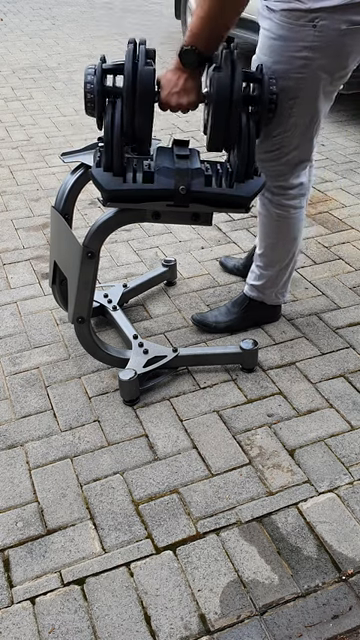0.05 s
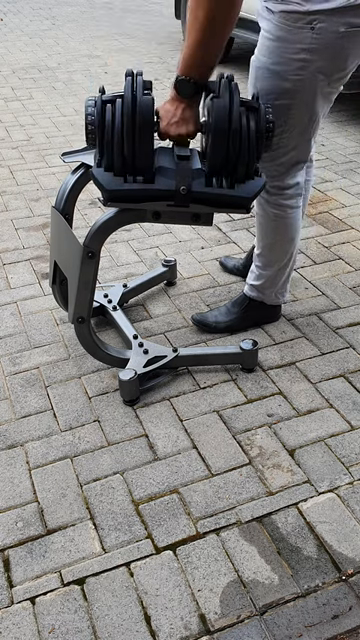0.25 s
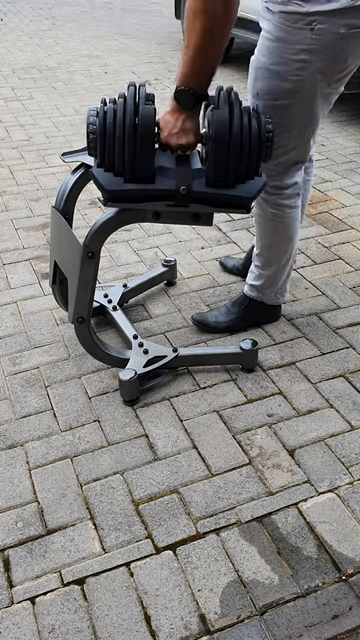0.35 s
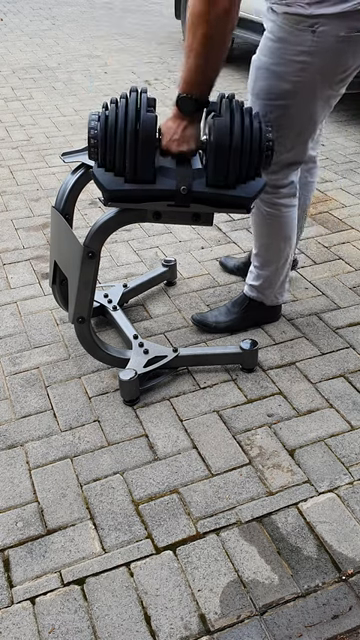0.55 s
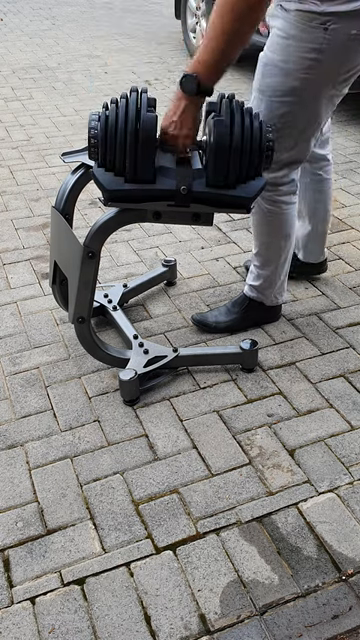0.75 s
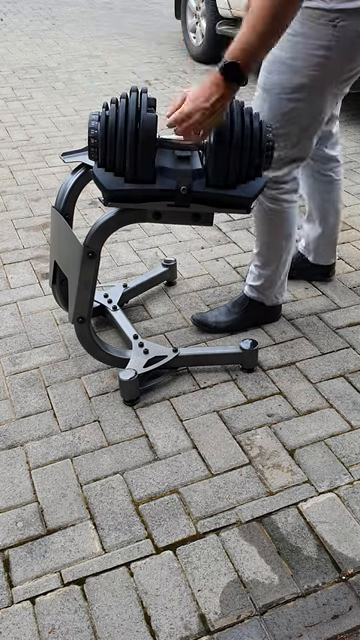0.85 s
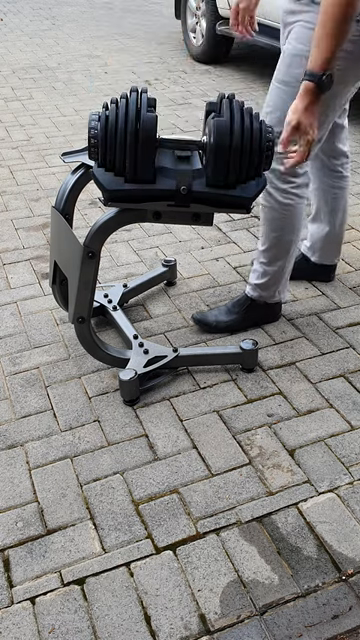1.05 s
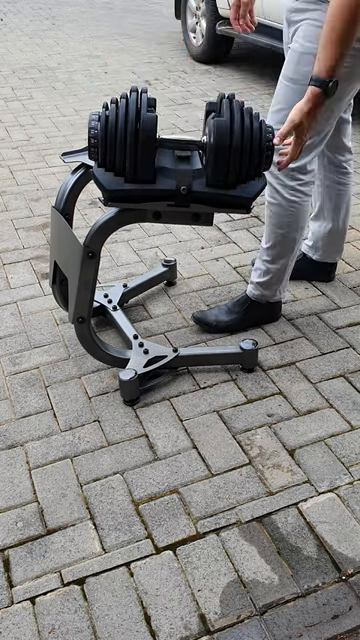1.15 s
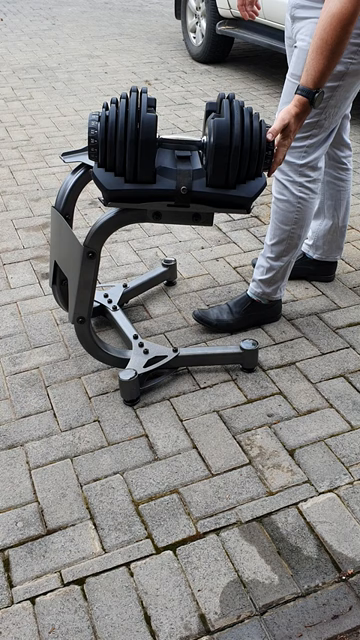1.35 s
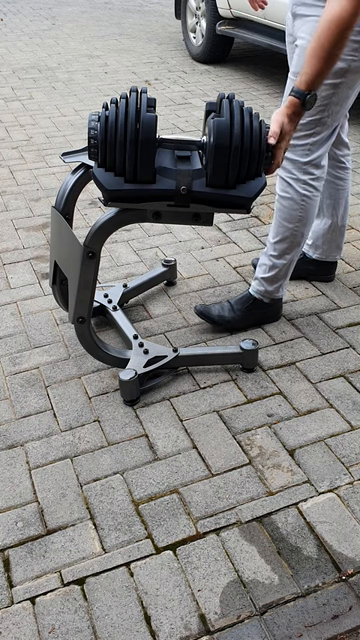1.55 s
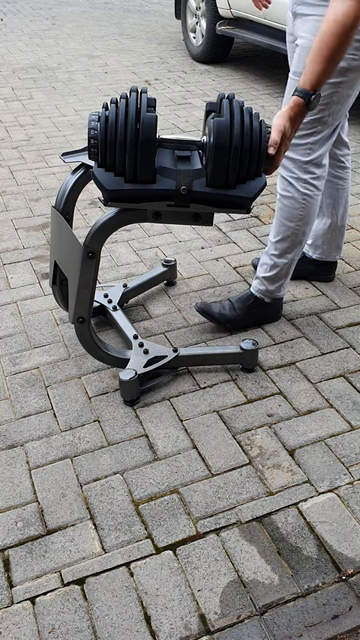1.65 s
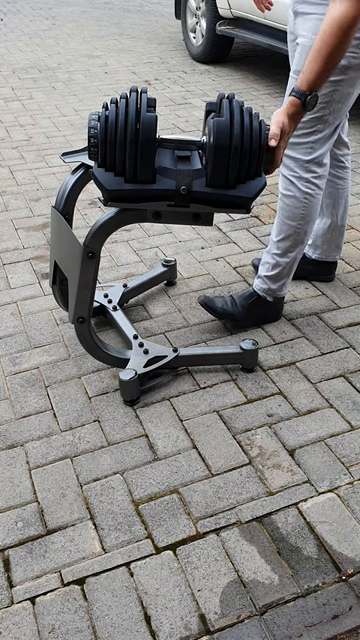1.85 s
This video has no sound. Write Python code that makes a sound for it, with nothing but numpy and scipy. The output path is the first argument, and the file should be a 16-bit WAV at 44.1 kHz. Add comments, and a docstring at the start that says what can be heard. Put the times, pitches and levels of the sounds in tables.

```python
"""A paved yard on two microphone ports, over a low outdoor rumble that runs from start to end.
First the loose plates of a heavy adjustable dumbbell jiggle, clatter into their cradle and land;
each blow is shaped noise plus a crack, over decaying sine modes of the steel stand and dull thuds.
Then faint birds whistle in gliding tones, and the weight dial turns with soft rubbing noise,
hollow resonant knocks and bright clicks. The walls answer hits and birds with a decaying noise tail."""
import sys
import numpy as np
from scipy import signal
from scipy.fft import irfft
from scipy.io import wavfile
from scipy.ndimage import uniform_filter1d

SR = 44100
rng = np.random.default_rng(int(sys.argv[2]) if len(sys.argv) > 2 else 0)


def store_wav(level_fs):
    """Save 16-bit WAV to argv[1]."""
    pcm = np.round(np.clip(np.atleast_2d(level_fs), -1, 1) * 32767)
    wavfile.write(sys.argv[1], SR, pcm.T.astype(np.int16))


N = 83790  # length in samples, 1.9 s

STRIKE_N = 8192  # samples in one strike
HZ = np.fft.rfftfreq(STRIKE_N, 1 / SR)
T = np.arange(SR) / SR  # one second
T_SCENE = np.arange(N) / SR


def amp(db):
    """Amplitude of a level in dB."""
    return 10 ** (np.asarray(db) / 20)


def unit(x):
    """Scales a signal to an RMS of one."""
    return x / np.sqrt(np.mean(abs(x) ** 2) + 1e-20)


def fall(t, t60):
    """Exponential decay that loses 60 dB in t60 seconds."""
    return np.exp(-np.log(1000) * t / t60)


def read(points, hz, column=1):
    """A column of a table, joined on a log-frequency axis."""
    p = np.array(points)
    return np.interp(np.log(hz + 1), np.log(p[:, 0]), p[:, column])


def add(mix, start_s, sound):
    """Lays a sound into the mix and cuts it at the end of the scene."""
    part = mix[:, max(round(start_s * SR), 0):][:, :sound.shape[1]]
    part += sound[:, :part.shape[1]]


# the two microphone ports: pitch_hz, likeness (0 to 1), left_lead_rad, left_minus_right_db
MIC_PORTS = [(50.8, 1, .05, -2.5), (200, 0.86, 0.89, -1), (561, .72, 0.83, -1.5), (1260, 0.17, 2.47, -1.5),
             (3200, 0.1, 3, 1), (6940, .15, 3, 7.5), (9700, .15, 1.6, 2), (14000, .15, 3.9, 8.5)]


def ports(hz):
    """Complex gain of the left and right port: half the level and phase difference on each side."""
    level = amp(read(MIC_PORTS, hz, column=3) / 2)
    left = level * np.exp(.5j * read(MIC_PORTS, hz, column=2))
    return np.array([left, 1 / left])


def scatter(hz):
    """A random-phase spectrum, partly shared by both ports as their likeness says."""
    a, b = np.exp(2j * np.pi * rng.random((2, len(hz))))
    same = np.clip(read(MIC_PORTS, hz), 0, 1)
    right = same * a + np.sqrt(1 - same ** 2) * b
    return ports(hz) * np.array([a, right])


def above(hz):
    """A smooth step over frequency, from 0 to 1 around hz."""
    return HZ ** 3 / (HZ ** 3 + hz ** 3)


def resonances(table):
    """Gain over frequency of a set of damped resonances, summed in power."""
    power = 0
    for hz, width, db in table:
        detuning = (HZ ** 2 - hz ** 2) / (width * HZ + 1)
        power = power + amp(db) ** 2 / (1 + detuning ** 2)
    return np.sqrt(power)


def hiss(spectrum):
    """Steady random-phase noise of a given colour, at an RMS of one."""
    hz = np.fft.rfftfreq(N, 1 / SR)
    return unit(irfft(scatter(hz) * amp(read(spectrum, hz)), N))


def strike(colour, t60, crack_db, rise_s):
    """One contact: a short minimum-phase crack and the brief dense ring of the part."""
    t = T[:STRIKE_N]
    rise = 1 - np.exp(-(t / rise_s) ** 2)
    ring = unit(irfft(scatter(HZ) * colour)) * fall(t, t60) * rise
    # the phase that packs the colour's energy as early as possible
    log_gain = np.log(np.maximum(colour / colour.max(), 1e-4))
    mirrored = np.r_[log_gain, log_gain[-2:0:-1]]
    phase = -signal.hilbert(mirrored).imag[:len(HZ)]
    crack = irfft(np.exp(log_gain + 1j * phase) * ports(HZ))
    crack = np.roll(crack, 24, axis=1)  # room for what precedes the peak
    crack = crack * (t < .1) * (1 - np.exp(-(t / .0003) ** 2))
    return ring + amp(crack_db) * crack * np.linalg.norm(ring) / np.linalg.norm(crack)


# decay of the echo between the walls: pitch_hz, t60_s
YARD_DECAY = [(80, 0.53), (250, 0.39), (650, 0.55), (1500, .44), (3500, .36), (7000, 0.3), (13000, .28)]
YARD_RISE_S = 0.004


def yard(dry, wet_db):
    """Adds the diffuse echo of the walls: a noise tail whose bands each die at their own speed."""
    hz = np.fft.rfftfreq(SR, 1 / SR)
    noise = scatter(hz)
    nodes = np.log([pitch_hz for pitch_hz, _ in YARD_DECAY])
    tail = np.zeros((2, SR))
    for pick, (_, t60) in zip(np.eye(len(YARD_DECAY)), YARD_DECAY):
        band = np.interp(np.log(hz + 1), nodes, pick)  # overlapping triangles
        tail += irfft(noise * band) * fall(T, t60)
    tail *= 1 - np.exp(-T / YARD_RISE_S)
    tail /= np.linalg.norm(tail)
    source = dry.sum(0)[None]
    return dry + amp(wet_db) * signal.fftconvolve(source, tail, axes=1)[:, :N]


# colour of the outdoor rumble: pitch_hz, relative_level_db
AIR_COLOUR = [(18, -34.5), (30, -11), (50, -0.5), (70, 3), (100, -3.5), (140, -15), (250, -17.5),
              (500, -27.5), (1000, -27), (1600, -25), (1900, -33), (2500, -20), (3400, -32), (4500, -36),
              (6300, -41.5), (8000, -52.5), (15000, -48.5)]
AIR_DB = -60  # RMS


def air():
    """Low outdoor rumble: steady noise weighted to the bass."""
    return amp(AIR_DB) * hiss(AIR_COLOUR)


# bird notes: start_s, length_s, start_hz, end_hz, level_db (before echo)
BIRD_NOTES = [(0.77, 0.046, 2822, 2770, -67), (0.84, 0.085, 2708, 2670, -73),
              (0.975, 0.042, 2738, 2677, -74), (1.015, 0.045, 2685, 2583, -68),
              (1.012, 0.085, 895, 945, -70.5), (1.077, .11, 2683, 2580, -71.5),
              (1.086, .12, 3407, 3420, -75.5), (1.112, 0.041, 1560, 1590, -69.5),
              (1.25, 0.042, 2874, 2780, -73.5), (1.286, 0.065, 2710, 2800, -65.5),
              (1.374, 0.076, 2695, 2650, -69.5), (1.38, .11, 3410, 3485, -79.5),
              (1.593, 0.037, 2860, 2740, -64.5), (1.65, 0.056, 2535, 2505, -57.5),
              (1.823, 0.024, 2695, 2480, -52.5), (1.864, 0.026, 2666, 2440, -49.5)]
NOTE_WAVER = 0.011  # RMS share of the pitch
NOTE_OCTAVE_DB, NOTE_WET_DB = -19.5, -1.5


def bird():
    """Thin wavering whistles: gliding sines with a weak octave, echoed by the yard."""
    out = np.zeros((2, N))
    for start_s, length_s, start_hz, end_hz, level_db in BIRD_NOTES:
        u = np.arange(0, length_s, 1 / SR) / length_s  # progress, 0 to 1
        waver = unit(uniform_filter1d(rng.standard_normal(SR), size=120))[:len(u)]
        glide_hz = start_hz + (end_hz - start_hz) * u
        turn = 2 * np.pi * np.cumsum(glide_hz * (1 + NOTE_WAVER * waver)) / SR
        whistle = np.sin(turn) + amp(NOTE_OCTAVE_DB) * np.sin(2 * turn)
        swell = np.sqrt(np.sin(np.pi * u))
        add(out, start_s, amp(level_db) * (swell * whistle)[None])
    return yard(out, NOTE_WET_DB)


# hand and dial rubbing: peak_s, rise_s, fall_s (time constants), level_db (at the peak)
RUB_SWELLS = [(0.808, 0.022, 0.037, -55), (1.605, 0.035, 0.06, -60), (1.782, .006, 0.016, -69),
              (1.882, 0.022, 0.026, -52)]
# colour of the rubbing: pitch_hz, relative_level_db
RUB_COLOUR = [(60, -18), (500, 4.5), (1000, 4), (1700, 5), (2500, -3.5), (4000, -2.5), (6500, -18),
              (8000, -19), (11000, -21), (16000, -40)]


def rubs():
    """Soft friction: noise that swells and fades exponentially."""
    swell = np.zeros(N)
    for peak_s, rise_s, fall_s, level_db in RUB_SWELLS:
        distance = np.maximum((peak_s - T_SCENE) / rise_s, (T_SCENE - peak_s) / fall_s)
        swell += amp(level_db) * np.exp(-distance)
    return hiss(RUB_COLOUR) * swell


# the dial's detent snapping: start_s, level_db (before decay and echo), treble_db
DETENT_CLICKS = [(1.625, -37, -0.5), (1.6284, -36, -9), (1.6447, -41.5, 0), (1.657, -41, 1),
                 (1.890, -29, 7), (1.894, -30, -3)]
# resonances of the detent: pitch_hz, width_hz, relative_level_db
DETENT_RESONANCES = [(1470, 490, -4), (2590, 1400, -2), (4026, 160, 9), (5550, 550, -5.5),
                     (6720, 350, -4.5), (8700, 600, -19), (10450, 320, 4), (11600, 900, -18.5),
                     (13600, 280, -3)]
CLICK_TREBLE_HZ = 7000
CLICK_T60_S, CLICK_RISE_S = 0.043, 0.0009
CLICK_CRACK_DB, CLICK_WET_DB = -17, -5


def dial():
    """Bright metallic snaps of the detent: short strikes on its high resonances."""
    out = np.zeros((2, N))
    body = resonances(DETENT_RESONANCES)
    for start_s, level_db, treble_db in DETENT_CLICKS:
        colour = body * amp(treble_db * above(CLICK_TREBLE_HZ))
        click = strike(colour, CLICK_T60_S, CLICK_CRACK_DB, CLICK_RISE_S)
        add(out, start_s, amp(level_db) * click)
    return yard(out, CLICK_WET_DB)


# weight bearing on the stand: start_s, pitch_hz, level_db (before decay), t60_s
DULL_THUDS = [(0.088, 196, -42, 0.093), (0.13, 60.5, -47, 0.34), (0.238, 78, -29, 0.26),
              (0.214, 208, -34.5, 0.13), (0.3831, 243.2, -13, 0.085), (0.789, 165.4, -57.5, 0.27),
              (1.654, 101, -56.5, 0.31)]
THUD_RISE_S = 0.0012


def thuds():
    """Low, quickly damped swings of the cradle: single decaying sines."""
    out = np.zeros((2, N))
    rise = 1 - np.exp(-(T / THUD_RISE_S) ** 2)
    for start_s, pitch_hz, level_db, t60_s in DULL_THUDS:
        swing = np.exp(2j * np.pi * pitch_hz * T) * fall(T, t60_s) * rise
        heard = (ports(np.array([pitch_hz])) * swing).imag
        add(out, start_s, amp(level_db) * heard)
    return out


# modes of the steel stand: pitch_hz, relative_level_db, t60_s
STAND_MODES = [(49.17, -35.5, .9), (102.7, -21.5, 0.9), (162.8, -27.5, .7), (198, -17, 0.46),
               (274.9, -11.5, .4), (315, -17, 0.42), (372, -23.5, 0.26), (441.7, -5.5, 0.15),
               (545.4, -14, 0.39), (607.3, -20, 0.42), (680, -13.5, 0.55), (752, -18.5, .56),
               (785, -19.5, .45), (892, -22.5, 0.33), (1007, -57.5, 5), (1507, -20.5, 0.79),
               (1650, -24.5, .45)]
STAND_DB = -4.5  # all modes, against the level of each blow


def stand():
    """The stand's modes ring at every plate blow, each time in new random phases."""
    hz, mode_db, t60 = np.transpose(STAND_MODES)
    out = np.zeros((2, N))
    turning = np.exp((2j * np.pi * hz - np.log(1000) / t60)[:, None] * T_SCENE)
    rise = 1 - np.exp(-T_SCENE / .003)
    waves = amp(STAND_DB + mode_db)[:, None] * turning * rise
    parts = np.vstack([waves.real, -waves.imag])
    gains = ports(hz)
    for start_s, level_db, _, _ in PLATE_BLOWS:
        kick = gains * np.exp(2j * np.pi * rng.random(len(hz)))
        # the real part of kick times waves, summed over the modes
        ringing = np.hstack([kick.real, kick.imag]) @ parts
        add(out, start_s, amp(level_db) * ringing)
    return out


# plates rocking against one another: start_s, level_db (before decay and echo)
PLATE_KNOCKS = [(0.001, -45), (0.1, -41), (0.24, -26.5), (0.425, -16.5), (0.555, -32), (0.59, -33),
                (0.612, -38), (0.66, -37.5), (1.5, -64), (1.525, -62), (1.552, -51), (1.58, -54.5),
                (1.598, -55), (1.626, -51.5), (1.80, -46.5), (1.811, -46), (1.823, -48), (1.835, -46.5),
                (1.87, -54.5), (1.89, -43.5)]
# hollow resonances of the plates: pitch_hz, width_hz, relative_level_db
PLATE_RESONANCES = [(450, 12, -4.5), (500, 22, -2.5), (667, 20, -2.5), (706, 11, 2.5), (1340, 70, -18.5),
                    (1560, 90, -9.5), (1690, 150, -11)]
KNOCK_T60_S, KNOCK_RISE_S = 0.091, 0.0005
KNOCK_CRACK_DB, KNOCK_WET_DB = -21.5, -9.5


def plates():
    """Hollow knocks as the plates rock: strikes on their resonances with the treble held down."""
    out = np.zeros((2, N))
    colour = resonances(PLATE_RESONANCES) * amp(-18 * above(5200))
    for start_s, level_db in PLATE_KNOCKS:
        knock = strike(colour, KNOCK_T60_S, KNOCK_CRACK_DB, KNOCK_RISE_S)
        add(out, start_s, amp(level_db) * knock)
    return yard(out, KNOCK_WET_DB)


# plates striking the cradle: start_s, level_db (before decay and echo), bass_db, treble_db
PLATE_BLOWS = [(0.001, -36.5, -7.5, 4.5), (0.027, -46.5, -2, 0), (0.051, -44.5, 3.5, 5.5),
               (0.072, -53.5, 0, 4), (0.084, -41.5, -10, 4.5), (0.099, -42, -4, -0.5),
               (0.119, -48.5, -4, 8), (0.14, -50, -1.5, 14), (0.163, -42, -8.5, 4.5),
               (0.177, -49.5, -2, 4.5), (0.193, -42.5, -6.5, 4), (0.2095, -37.5, -1.5, 5),
               (0.214, -24, 2.5, -5), (0.22, -23, 4.5, -6), (0.229, -25, -2, -4.5),
               (0.238, -19.5, -0.5, -7), (0.256, -19, -20, -7.5), (0.264, -24.5, -17, 0.5),
               (0.278, -20, -1.5, -2.5), (0.285, -23, -9.5, -0.5), (0.297, -26, -10, 3.5),
               (0.306, -26, 2.5, 1), (0.316, -20.5, -0.5, 1.5), (0.325, -22.5, 7.5, 5),
               (0.332, -24.5, -9, 5.5), (0.384, -17.5, 1.5, 1.5), (0.395, -17.5, -3, -7.5),
               (0.401, -16, -4, 5), (0.410, -19, 1.5, 1.5), (0.4167, -13, -4, 4), (0.43, -25, 0.5, -2.5),
               (0.457, -26.5, -13.5, -2), (0.485, -30.5, 0, -36), (0.519, -35, 11, -12),
               (0.553, -38.5, 30, -23), (0.652, -49, -12, -10)]
# dense ring of the loaded cradle: pitch_hz, relative_level_db
CLATTER_COLOUR = [(25, -40), (60, -23.5), (100, -10), (140, -8), (220, -4.5), (450, -4), (700, -6),
                  (1050, -7), (1550, -4), (2000, -10.5), (2500, -10.5), (3000, -16.5), (4000, -15.5),
                  (4800, -23.5), (6300, -27.5), (7800, -35.5), (10500, -34.5), (14500, -49), (16000, -53)]
BASS_HZ, TREBLE_HZ = 270, 2960  # where each blow's bass and treble tilt set in
CLATTER_T60_S, CLATTER_RISE_S = 0.083, 0.00088
CLATTER_CRACK_DB, CLATTER_WET_DB = -5.5, -2.5


def dumbbell():
    """Plates clatter into the cradle: dense strikes, each with its own bass and treble."""
    out = np.zeros((2, N))
    body_db = read(CLATTER_COLOUR, HZ)
    for start_s, level_db, bass_db, treble_db in PLATE_BLOWS:
        tilt_db = bass_db * (1 - above(BASS_HZ)) + treble_db * above(TREBLE_HZ)
        colour = amp(body_db + tilt_db)
        blow = strike(colour, CLATTER_T60_S, CLATTER_CRACK_DB, CLATTER_RISE_S)
        add(out, start_s, amp(level_db) * blow)
    return yard(out, CLATTER_WET_DB)


def scene():
    """The whole yard at the microphone ports, background first."""
    background = air() + bird()
    handling = rubs() + dial()
    landing = thuds() + stand() + plates() + dumbbell()
    return background + handling + landing


CEILING = .75  # full scale is 1
EDGE_HZ = 15900


def record(dry):
    """Soft overload on the hardest peaks, then the recorder's band limit."""
    held = dry / (1 + (dry / CEILING) ** 4) ** .25
    lowpass = signal.firwin(511, EDGE_HZ, window=("kaiser", 9), fs=SR)
    return signal.oaconvolve(held, lowpass[None], "same")


dry = scene()
out = record(dry)
store_wav(out)
```